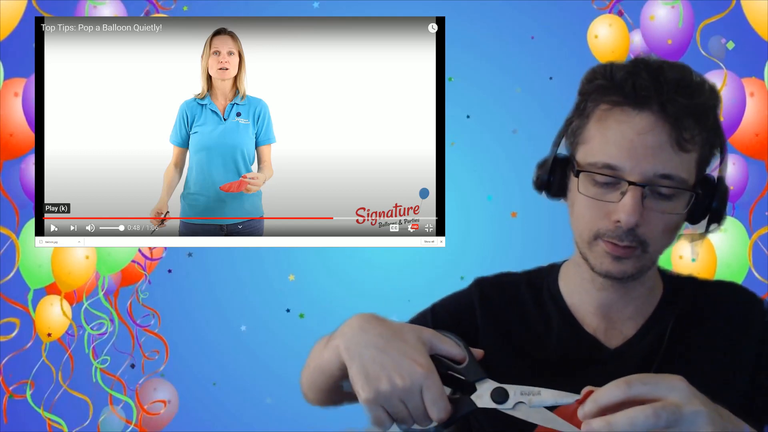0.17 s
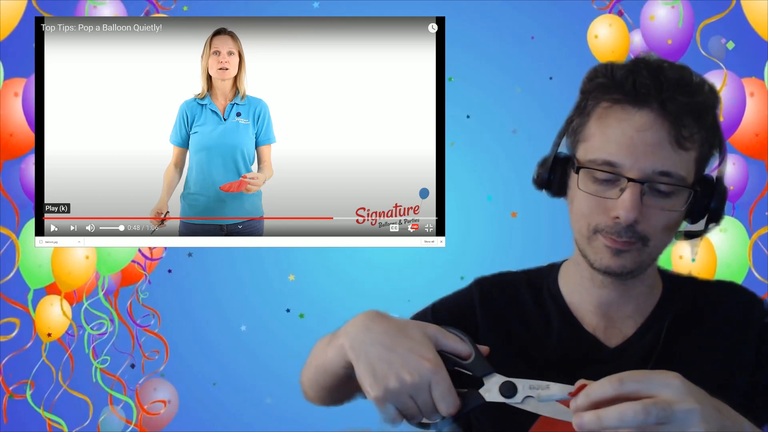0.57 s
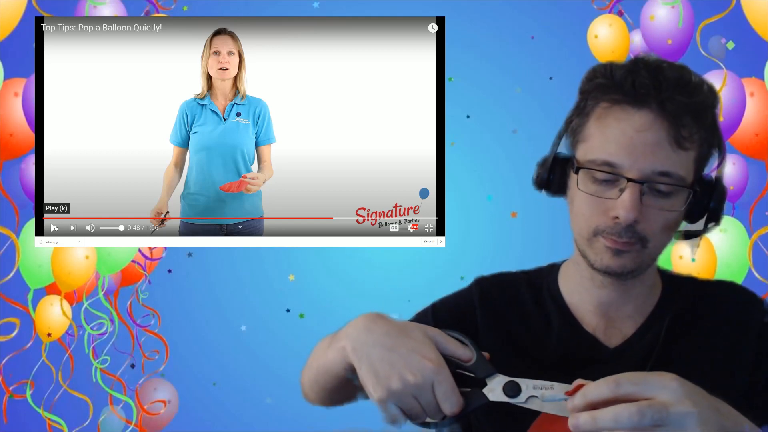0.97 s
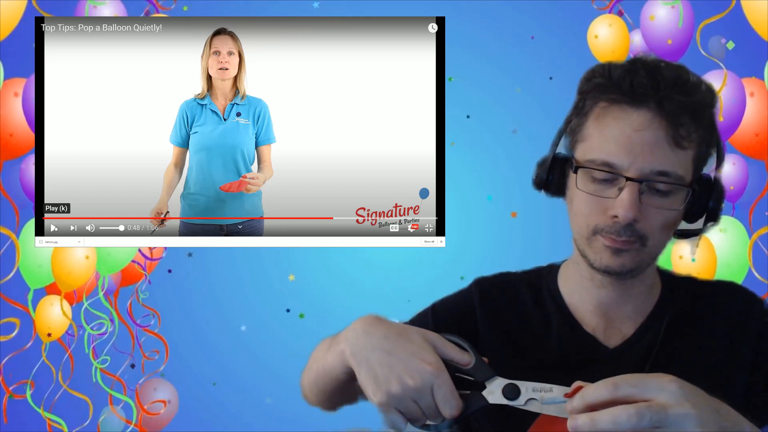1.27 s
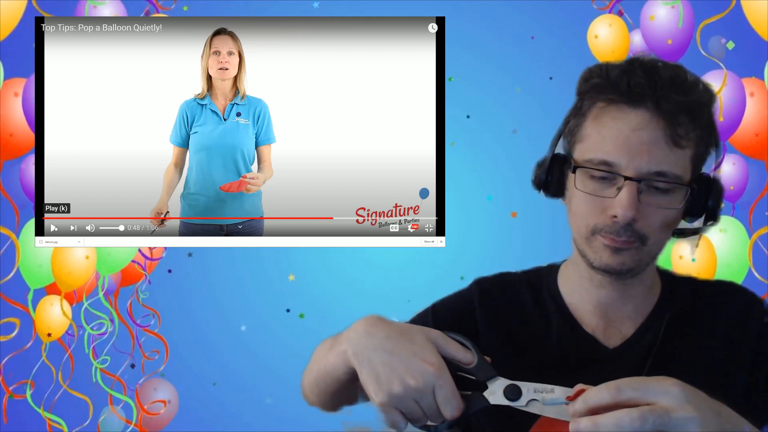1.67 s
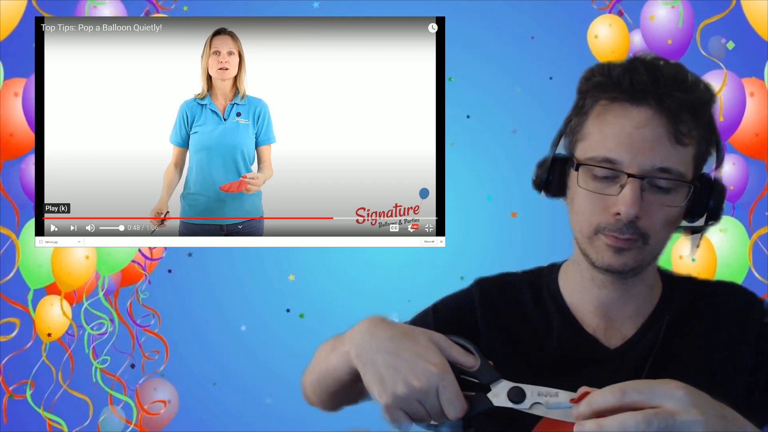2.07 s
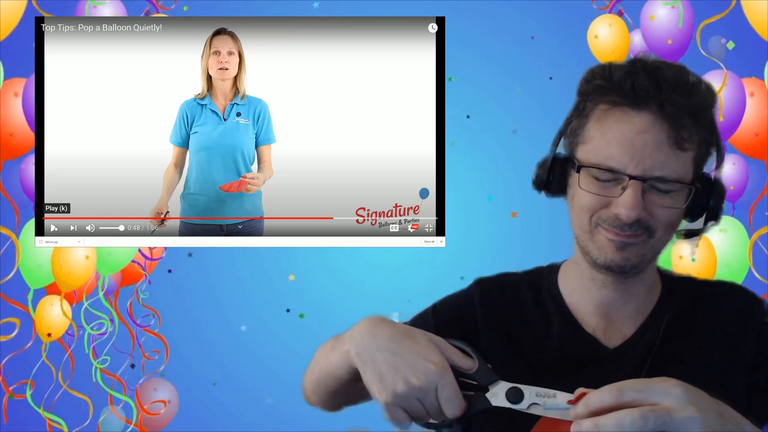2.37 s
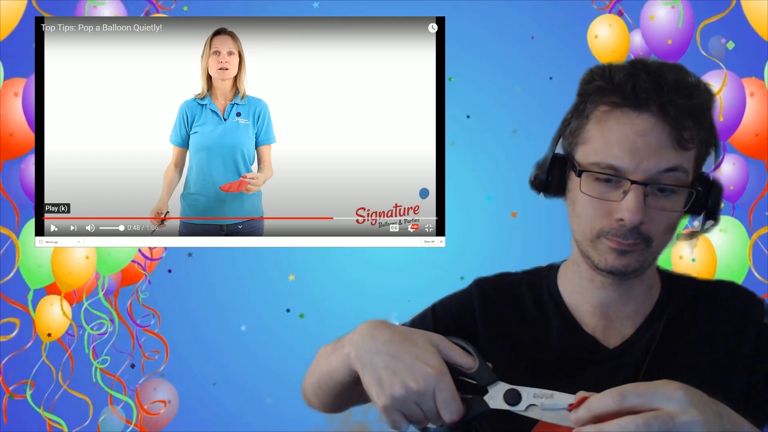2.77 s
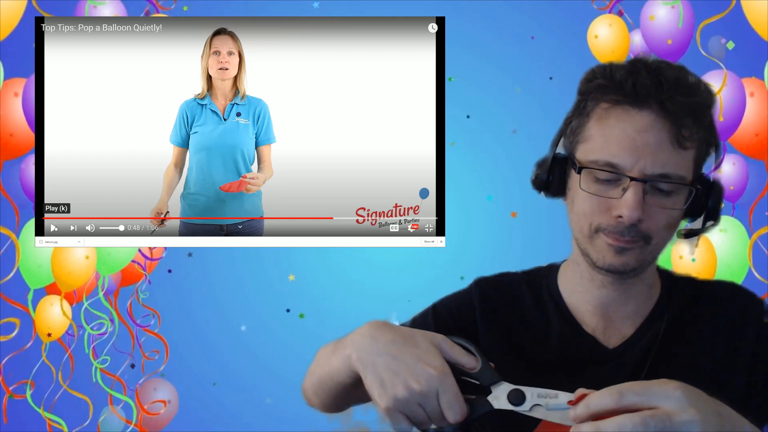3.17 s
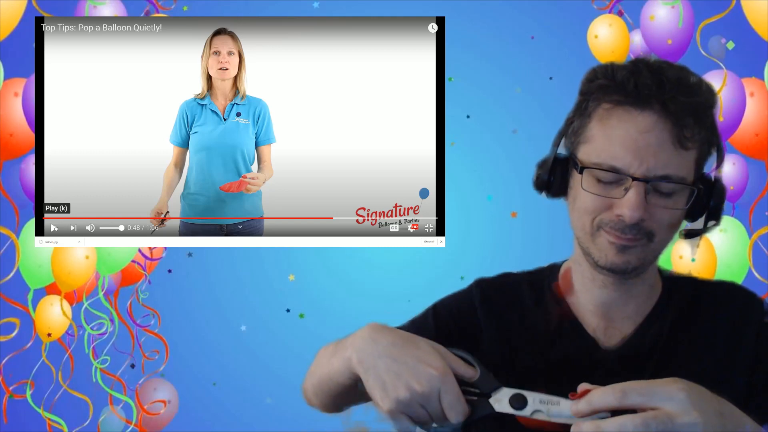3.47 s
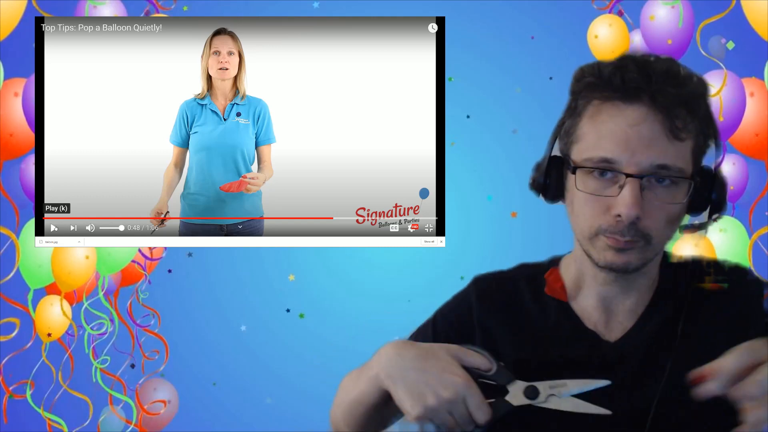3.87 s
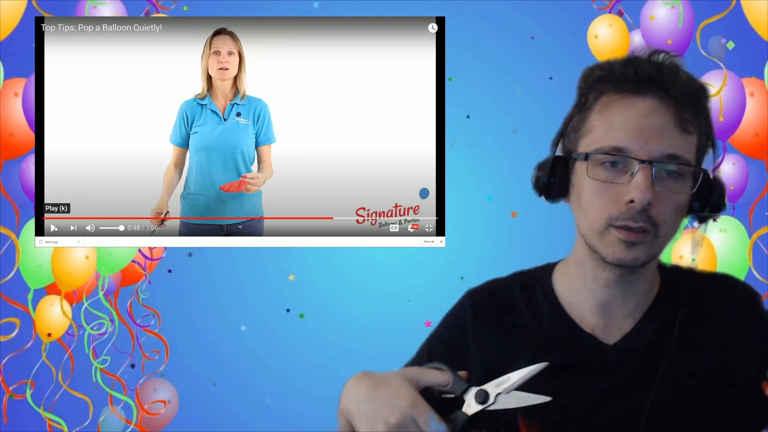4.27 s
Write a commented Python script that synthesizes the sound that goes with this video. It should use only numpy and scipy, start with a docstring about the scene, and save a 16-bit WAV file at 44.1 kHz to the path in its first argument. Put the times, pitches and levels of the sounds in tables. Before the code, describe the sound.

Steady soft fan noise with low mains hum and a faint thin high whine runs throughout. From 0 to 0.4 s, very close taut rubber creaks in about nine separate hard, bright stick-slip snaps, irregular, closer together and weakening, with a slight hollow shudder and room reflections. Then it is quiet except for soft dull desk knocks around 0.9 to 1.2 s and 1.9 to 2.2 s, and a tiny crackle at 1.7 s. Around 2.1 to 2.4 s the blade rubs and crackles finely, with two weaker rubber snaps near 2.3 s. At 2.4 s a nick opens: breathy air hisses and flutters, puffing up near 2.67 and 2.94 s, with sharper crackles about 3.03 s. The hiss surges at 3.08 s and the balloon bursts at 3.1 s: one enormous, flat-clipped bang, a dense bright room tail fading over roughly a second, low wind buffeting on the microphone, and barely noticeable late knocks and a tick at 4.2 s.

```python
"""In a hard-walled room, scissors work at the neck of a taut latex balloon close to a microphone.
The rubber creaks in single stick-slip snaps that excite damped modes; a hand bumps the desk into
its low modes; the blade crackles and rubs in bright noise bursts and grains. A nick lets air hiss
out as jet noise, then the skin tears: a burst of shocks and a long diffuse tail overload the input,
with a low puff of air on the microphone. Fan noise, mains hum and a thin whine last throughout."""
import sys
import numpy as np
from scipy import signal
from scipy.io import wavfile

SR = 44100
rng = np.random.default_rng(int(sys.argv[2]) if len(sys.argv) > 2 else 0)


def how_loud(loudness_db):
    """Turn decibels into a plain amplitude multiplier (0 dB gives 1, 20 dB gives 10)."""
    steps = np.asarray(loudness_db, float) / 20
    return 10 ** steps


def to_wav(s):
    """Save 16-bit WAV."""
    ch = np.atleast_2d(s).T  # columns
    pcm = np.round(np.clip(ch, -1, 1) * 32767)  # PCM
    wavfile.write(sys.argv[1], SR, pcm.astype(np.int16))


N = 195186

# fan and input noise, spectral density: (f/Hz, level/dB per Hz, relative)
AIR_SPECTRUM = [(15, -41), (25, -9), (69, -7.5), (113, -15.5), (378, -23.5), (432, -22), (494, -23),
                (846, -17.5), (942, -18), (1490, -13.5), (2920, -16), (5870, -23.5), (6530, -27),
                (7080, -28), (15400, -41)]
AIR_DB, WHINE_DB = -57, -78   # rms levels of the noise and the whine
# steady tones: (f/Hz, mean level/dB rms)
HUM_TONES = [(59.8, -59), (432, -79.5), (829, -82.5)]
# stick-slip snaps of the rubber: (t/s, drive level/dB)
SLIP_EVENTS = [(.0110, -11), (0.0735, -10.5), (0.2181, -12), (0.2887, -14.5), (0.334, -14), (0.3582, -14),
               (.3772, -15), (0.393, -16), (0.41, -16.7), (2.2779, -32.5), (2.3365, -28.5)]
REVERSE_S = 1.0   # slips from this time on push the other way
# modes of the taut skin: (f/Hz, relative level/dB, T60/s)
SKIN_MODES = [(1175, -13.5, 0.017), (1833, -13.5, 0.012), (2457, -17.5, 0.012), (2820, -14, 0.0118),
              (3464, -31.5, 0.028), (4800, -6, 0.0027), (5730, -12, 0.0045), (7360, -5, 0.0014),
              (9130, -11, 0.0054), (11100, -23.5, .003), (12400, -3.5, 0.0016), (14200, -11.5, .004)]
# modes of the low hollow shudder: (f/Hz, level/dB, T60/s)
HOLLOW_MODES = [(134, -60.5, 0.043), (219, -60, 0.091)]
# reverberation time of the room: (f/Hz, T60/s)
ROOM_DECAY = [(60, .5), (170, 0.96), (400, 0.55), (1400, 0.86), (4000, 0.84), (6000, 0.63), (8500, 0.53),
              (13000, 0.45)]
# colour of the reflections of the close sounds: (f/Hz, relative level/dB)
WALL_COLOUR = [(200, 0), (500, 0), (900, -8), (1800, -5), (4000, -10.5), (12000, -11.0)]
# soft knocks carried through the desk: (t/s, drive level/dB)
KNOCK_EVENTS = [(0.876, -41), (1.0548, -43.5), (1.1635, -53.5), (1.921, -42.5), (1.9537, -47.5),
                (2.05, -47), (2.1572, -39), (3.3768, -32.5), (3.5343, -49.5), (3.9682, -54),
                (4.0775, -55.5)]
# modes of the desk: (f/Hz, relative level/dB, T60/s)
DESK_MODES = [(87, -19, 0.024), (136, 3, 0.043), (234, 1, 0.05), (590, 0, 0.028)]
# crackles of blade on rubber: (t/s, peak level/dB, T60/s, lowest f/Hz)
CRACKLE_EVENTS = [(1.688, -42, .03, 6500), (2.1035, -45, .015, 7000), (2.1112, -40, .05, 2500),
                  (2.140, -44, .02, 6000), (2.147, -42, .02, 6000), (2.173, -42, .02, 4000),
                  (2.2143, -37, .05, 4000), (2.797, -33, .02, 5000), (3.022, -32.5, .015, 4000),
                  (3.037, -25.5, .03, 800), (3.056, -23.5, .006, 4500), (3.0587, -27.5, .008, 4000),
                  (4.175, -40.5, 0.006, 4000)]
# the blade rubs along the rubber: times in s, then level in dB and mean grain rate per s
RUB_START_S, RUB_PEAK_S, RUB_END_S, RUB_DB, RUB_GRAINS_PER_S = 2.07, 2.15, 2.45, -63, 1500
# air escaping through the nick: (t/s, level/dB)
LEAK_LEVEL = [(2.42, -44), (2.45, -49.5), (2.57, -48), (2.6, -41), (2.645, -39), (2.668, -33), (2.705, -46),
              (2.86, -46), (2.94, -38), (2.965, -48), (3.04, -50)]
NICK_S, NICK_OPENS_S = 2.392, .006   # the blade goes through; time taken to open
# the nick runs into a slit: fast growth up to RIP_S, then slower
RIP_S, RIP_DB, RIP_STARTS_DB_PER_S, RIP_GROWS_DB_PER_S = 3.081, -28, 850, 170
# spectral density of the jet noise: (f/Hz, relative level/dB per Hz)
JET_SPECTRUM = [(120, -54), (200, -24), (564, -19.5), (676, -28), (811, -16.5), (1190, -25.5), (1330, -14),
                (1770, -20), (3480, -13), (3880, -11.5), (8630, -3.5), (15400, -15.5)]
BANG_S, BANG_DB, TEAR_S = 3.1047, 22.5, 0.0064   # onset, level, decay constant of the tear
# colour of the bang in the room: (f/Hz, relative level/dB per Hz)
BANG_COLOUR = [(35, -42.5), (60, -23), (312, -14), (412, -11), (828, -10.5), (997, -8.5), (1380, -2),
               (2100, -2), (2470, -3.5), (3330, -2), (8840, -6), (15400, -17)]
# edges of the third-octave bands: (f/Hz)
BAND_EDGES = 22 * 2 ** np.arange(0, 9.9, 1 / 3)
CLIP_TOP = 1.0   # amplitude of the flat tops


def rms_one(x):
    """Normalisation by mean power: scale to rms 1."""
    return x / np.sqrt(np.mean(x ** 2) + 1e-20)


def at_hz(points, hz):
    """Logarithmic frequency axis: read a table by interpolation along it."""
    table_hz, values = np.array(points).T[:2]
    return np.interp(np.log(hz), np.log(table_hz), values)


def bandpass(x, order, low_hz, high_hz):
    """Butterworth response: pass one band, flat at its middle."""
    return signal.sosfilt(signal.butter(order, [low_hz, high_hz], "band", fs=SR, output="sos"), x)


def drift(rate_hz):
    """Low-passed Gaussian noise: a slow random wander of spread 1."""
    decimation, settle = 40, 2000
    r = np.exp(-2 * np.pi * rate_hz * decimation / SR)
    white = rng.standard_normal(N // decimation + settle + 2)
    slow = rms_one(signal.lfilter([1], [1, -2 * r, r * r], white)[settle:])
    return np.interp(np.arange(N) / decimation, np.arange(len(slow)), slow)


def bands(size):
    """Third-octave analysis of white noise, neighbours unrelated: (centre f/Hz, band)."""
    white = rng.standard_normal((2, size))
    for k, (low, high) in enumerate(zip(BAND_EDGES, BAND_EDGES[1:])):
        yield np.sqrt(low * high), bandpass(white[k % 2], 2, low, high)


def coloured(spectrum, patchy_db):
    """Spectral shaping of noise by bands that flicker independently; rms 1."""
    total = np.zeros(N)
    for hz, band in bands(N):
        total += how_loud(at_hz(spectrum, hz) + patchy_db * drift(22)) * band
    return rms_one(total)


def resonance(x, hz, width_hz):
    """Two-pole resonance: the pole radius sets the bandwidth; rms 1."""
    r = np.exp(-np.pi * width_hz / SR)
    return rms_one(signal.lfilter([1, 0, -1], [1, -2 * r * np.cos(2 * np.pi * hz / SR), r * r], x))


def clicks(times, heights):
    """Unit-impulse idealisation: each event is one sample of given height."""
    out = np.zeros(N)
    out[np.round(np.asarray(times) * SR).astype(int)] = heights
    return out


def ring(push, modes):
    """Modal superposition: a push sets every damped mode of a body ringing."""
    out = 0
    for hz, level_db, t60 in modes:
        r, w = how_loud(-60 / (t60 * SR)), 2 * np.pi * hz / SR
        # the tiny offset keeps the decaying filter from vanishingly small numbers
        mode = signal.lfilter([0, how_loud(level_db) * np.sin(w)], [1, -2 * r * np.cos(w), r * r], push + 1e-18)
        out = out + mode
    return out


def background():
    """Stationary noise and tones: broad fan noise, slightly wavering hum and a narrow-band whine."""
    t = np.arange(N) / SR
    tones = np.zeros(N)
    for hz, db in HUM_TONES:
        tones += np.sqrt(2) * how_loud(db + 1.3 * drift(4.4)) * np.sin(2 * np.pi * hz * t)
    whine = resonance(resonance(rng.standard_normal(N), 6400, 200), 6400, 200)
    return how_loud(AIR_DB) * coloured(AIR_SPECTRUM, patchy_db=1.3) + tones + how_loud(WHINE_DB) * whine


def creak():
    """Stick-slip: each quick push and stronger recoil rings the skin modes in new strengths."""
    s, drive_db = np.transpose(SLIP_EVENTS)
    way = np.where(s < REVERSE_S, 1, -1)
    ms = np.arange(-12, 13) / SR * 1000
    push = 0.66 * np.exp(-((ms + .04) / .045) ** 2)
    recoil = np.exp(-((ms - .05) / 0.032) ** 2)
    spread_db = 1.7 * rng.standard_normal((len(s), len(SKIN_MODES)))
    rings = np.zeros(N)
    for k, mode in enumerate(SKIN_MODES):
        rings += ring(clicks(s, way * how_loud(drive_db + spread_db[:, k])), [mode])
    direct = clicks(s, way * how_loud(drive_db))
    out = np.convolve(how_loud(0.5) * direct + how_loud(-8.5) * rings, push - recoil, "same")
    # a small body radiates little bass
    return signal.sosfilt(signal.butter(2, 780, "high", fs=SR, output="sos"), out)


def hollow_shudder():
    """Noise-driven resonance: each creak also swells unevenly in low hollow modes."""
    s, drive_db = np.transpose(SLIP_EVENTS)
    t = np.arange(4000) / SR
    swell = t / 0.0084 * np.exp(-t / 0.011)
    envelope = np.convolve(clicks(s, how_loud(drive_db)), swell)[:N]
    return ring(envelope * rng.standard_normal(N), HOLLOW_MODES)


def room(x, colour, build_s, early_db, early_s):
    """Diffuse field: noise builds up fast and dies band by band, near walls adding early; energy 1."""
    t = np.arange(int(1.3 * SR)) / SR
    late = how_loud(-37 - 60 * t / 1.6)   # a faint slower tail from the space beyond
    tail = np.zeros(len(t))
    for hz, band in bands(len(t)):
        decay = how_loud(-60 * t / at_hz(ROOM_DECAY, hz)) + late
        tail += how_loud(at_hz(colour, hz)) * decay * band
    tail *= (1 - np.exp(-t / build_s)) * how_loud(early_db * np.exp(-t / early_s))
    return signal.fftconvolve(x, tail / np.sqrt(np.sum(tail ** 2)))[:N]


def desk_knocks():
    """Soft-contact excitation: a push of about 2 ms drives chiefly the low desk modes."""
    s, drive_db = np.transpose(KNOCK_EVENTS)
    contact = signal.windows.hann(80)
    push = np.convolve(clicks(s - .003, -how_loud(drive_db)), contact / contact.sum())[:N]
    return ring(push, DESK_MODES)


def crackles():
    """Impulsive friction: band-limited noise bursts with a sharp front and exponential decay."""
    out, t = np.zeros(N), np.arange(2600) / SR
    for s, peak_db, t60, low_hz in CRACKLE_EVENTS:
        noise = rng.standard_normal(len(t)) * how_loud(-60 * t / t60)
        burst = bandpass(noise, 3, low_hz, 13500)
        at = round(s * SR)
        out[at:at + len(t)] += how_loud(peak_db) * burst[:N - at] / np.abs(burst).max()
    return out


def rub():
    """Sliding friction: dense fine grains of bright noise swell and fade under one slow stroke."""
    stroke = np.interp(np.arange(N) / SR, [RUB_START_S, RUB_PEAK_S, RUB_END_S], [0, 1, 0])
    grains = (rng.random(N) < RUB_GRAINS_PER_S / SR) * rng.standard_normal(N)
    grains = grains + .1 * rng.standard_normal(N)
    return how_loud(RUB_DB + 3.0 * drift(30)) * stroke * resonance(grains, 9000, 6000)


def leak():
    """Turbulent jet: noise and a breathy whistle flutter with the nick's lips; the rip swells them."""
    t, (s, level_db) = np.arange(N) / SR, np.transpose(LEAK_LEVEL)
    since_rip = t - RIP_S
    rip_db = RIP_DB + np.minimum(RIP_STARTS_DB_PER_S * since_rip, RIP_GROWS_DB_PER_S * since_rip)
    opened = np.clip((t - NICK_S) / NICK_OPENS_S, 0, 1) * (t < BANG_S)   # ends at the bang
    flow = opened * np.hypot(how_loud(np.interp(t, s, level_db)), how_loud(np.clip(rip_db, -150, 0)))
    whistle = resonance(resonance(rng.standard_normal(N), 9000, 1500), 9000, 1500)
    flutter = how_loud(1.5 * drift(60))
    return flow * flutter * (coloured(JET_SPECTRUM, patchy_db=1.0) + how_loud(-6.5) * whistle)


def bang():
    """Sudden release of pressure: random shocks for a few ms, most of the energy in the diffuse field."""
    t = np.clip(np.arange(N) / SR - BANG_S, 0, 1)
    tear = rng.standard_normal(N) * (t > 0) * np.exp(-t / TEAR_S)
    direct = bandpass(tear / np.sqrt(np.sum(tear ** 2)), 2, 300, 11000)
    front = clicks([BANG_S], 0.84)
    diffuse = room(front, BANG_COLOUR, build_s=0.0055, early_db=11.5, early_s=0.078)
    return how_loud(BANG_DB) * (direct + how_loud(14.5) * diffuse)


def overload(x):
    """Saturation: a hard knee bends peaks into flat tops."""
    knee = 8.0   # higher is sharper
    return x / (1 + np.abs(x / CLIP_TOP) ** knee) ** (1 / knee)


def puff():
    """Flow buffeting: the freed air moves the microphone diaphragm in lumpy low noise that dies away."""
    t = np.clip(np.arange(N) / SR - BANG_S, 0, 2)
    low = bandpass(rng.standard_normal(N), 3, 14, 45)
    return how_loud(-34.5 - 60 * t / .5) * (1 - np.exp(-t / .005)) * rms_one(low)


def scene():
    """Linear superposition: close sounds, their reflections, desk, bang and background."""
    near = creak() + crackles() + rub() + leak()
    echo = how_loud(-13.5) * room(near, WALL_COLOUR, build_s=.003, early_db=13, early_s=0.045)
    desk = desk_knocks() + hollow_shudder()
    return (near + echo + desk + bang() + background())[None]


def low_pass(x):
    """Removes everything above the highest recorded frequency."""
    return signal.sosfilt(signal.butter(12, 15590, fs=SR, output="sos"), x)


def record(dry):
    """Nonlinear input: it overloads into flat tops; the air puff is added unclipped."""
    mix = overload(dry) + puff()
    return low_pass(mix)


dry = scene()
out = record(dry)
to_wav(out)
```